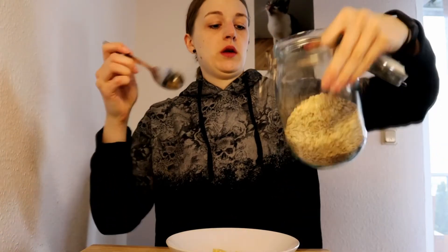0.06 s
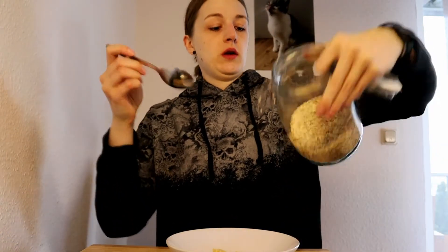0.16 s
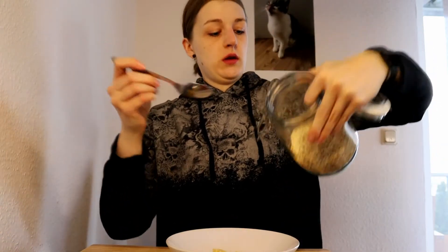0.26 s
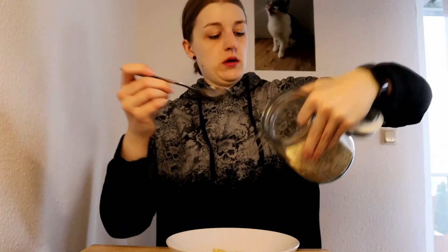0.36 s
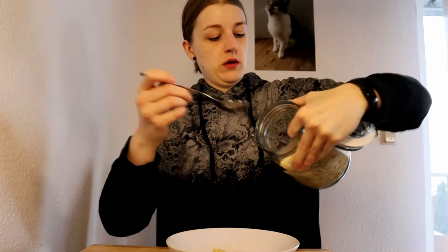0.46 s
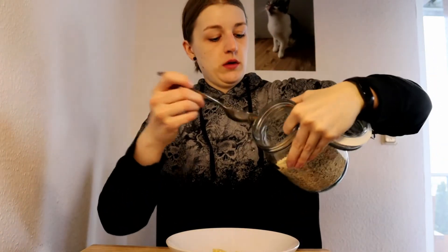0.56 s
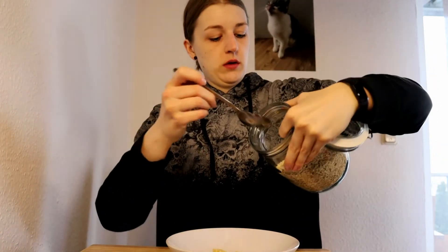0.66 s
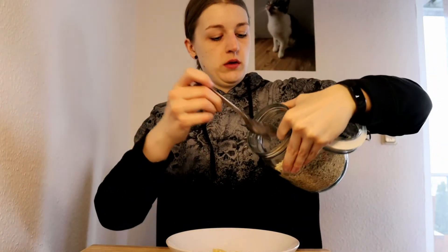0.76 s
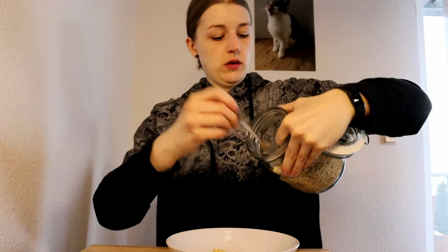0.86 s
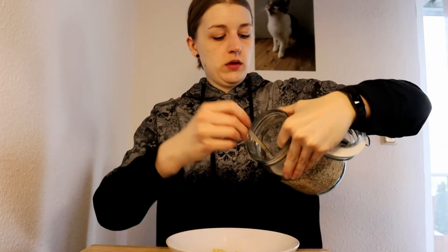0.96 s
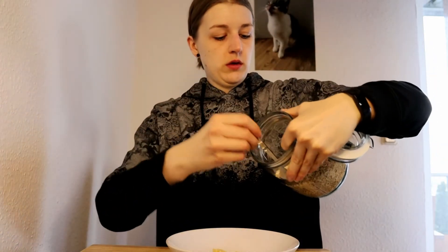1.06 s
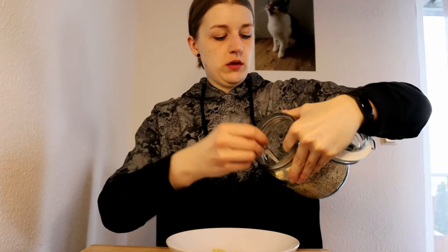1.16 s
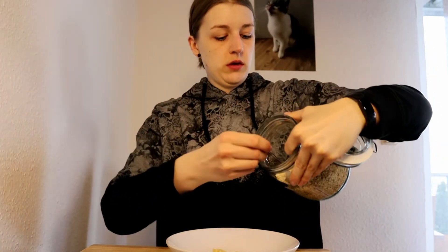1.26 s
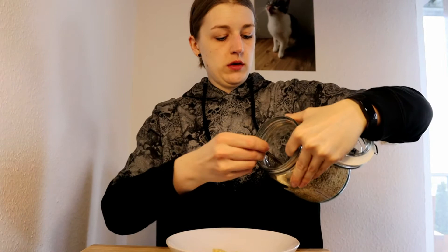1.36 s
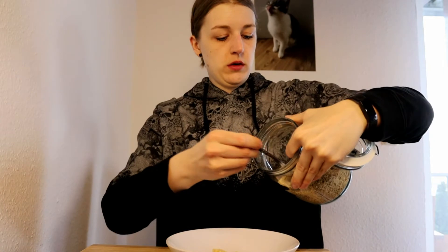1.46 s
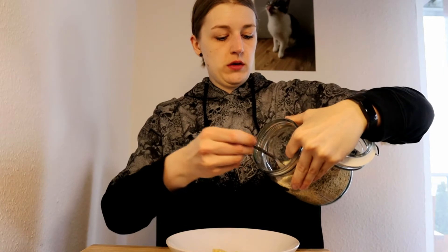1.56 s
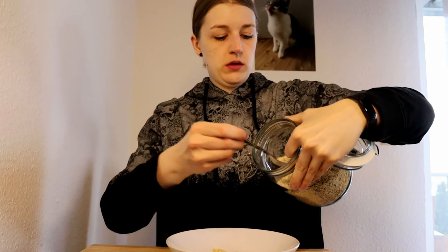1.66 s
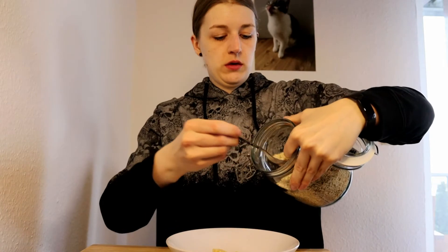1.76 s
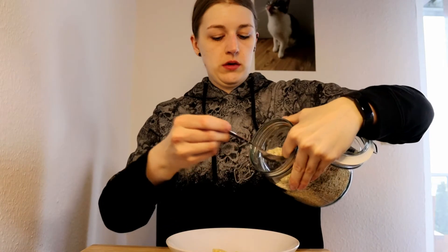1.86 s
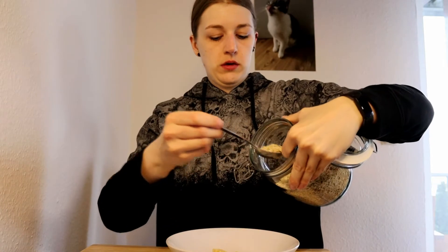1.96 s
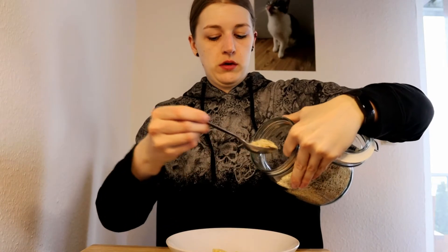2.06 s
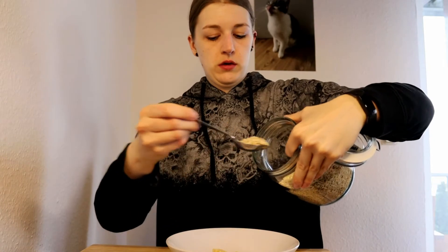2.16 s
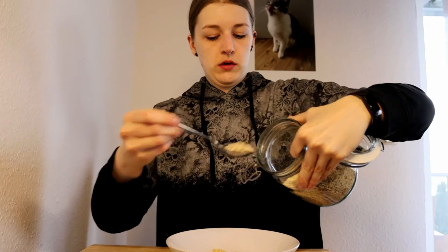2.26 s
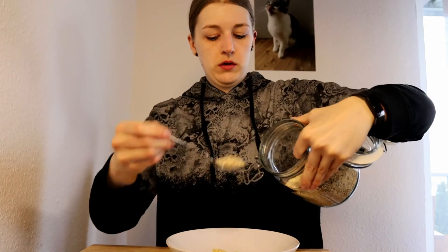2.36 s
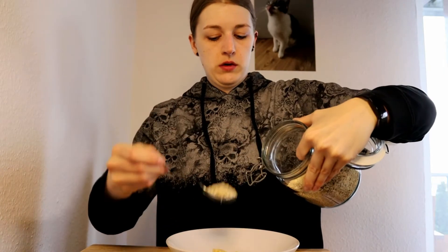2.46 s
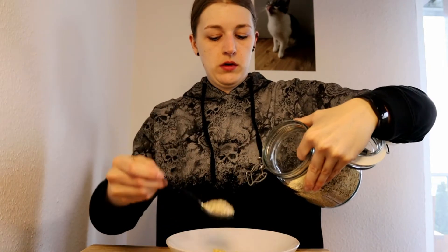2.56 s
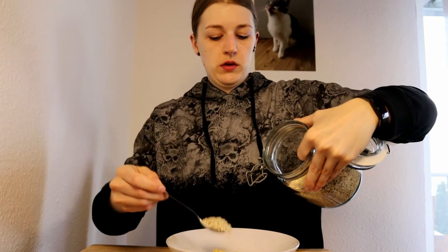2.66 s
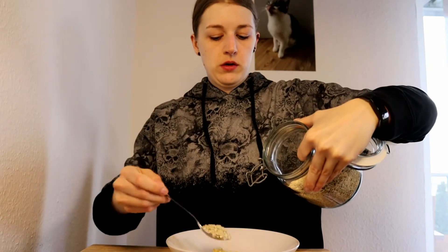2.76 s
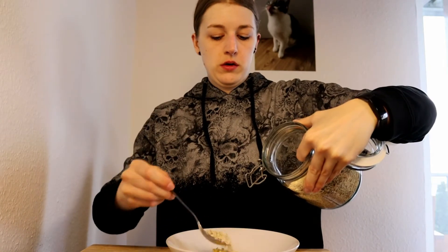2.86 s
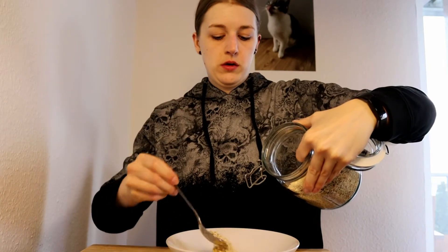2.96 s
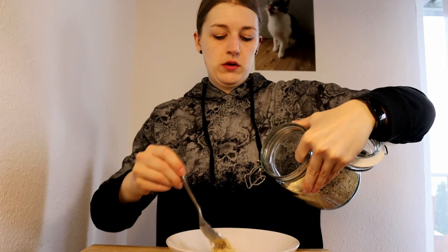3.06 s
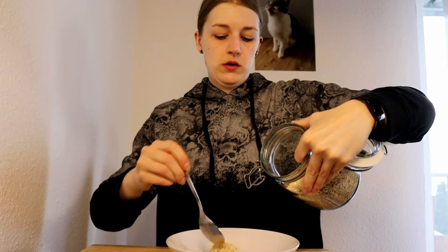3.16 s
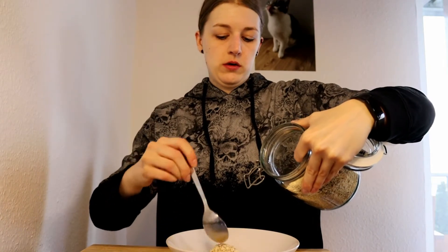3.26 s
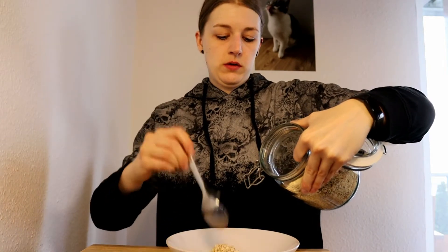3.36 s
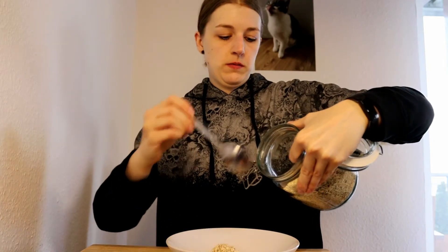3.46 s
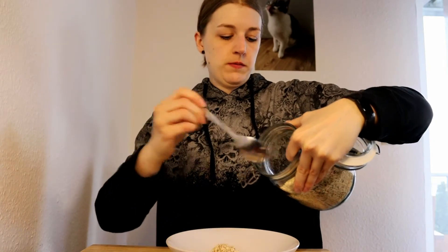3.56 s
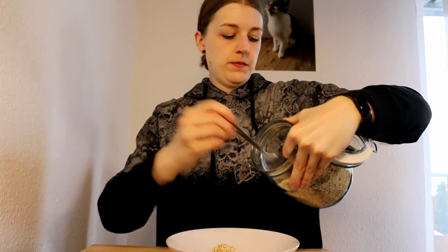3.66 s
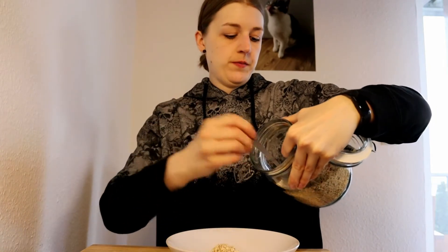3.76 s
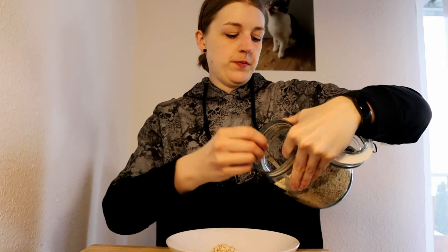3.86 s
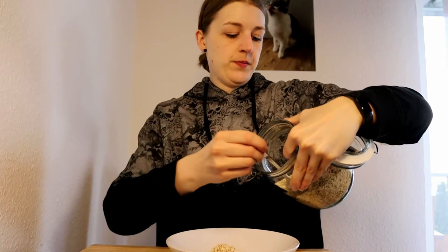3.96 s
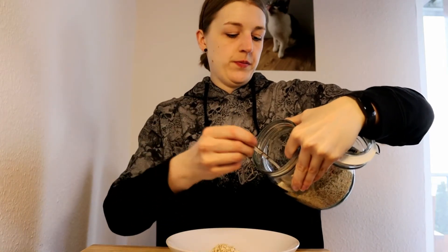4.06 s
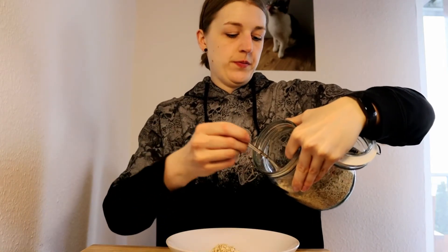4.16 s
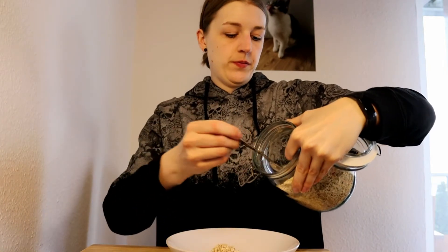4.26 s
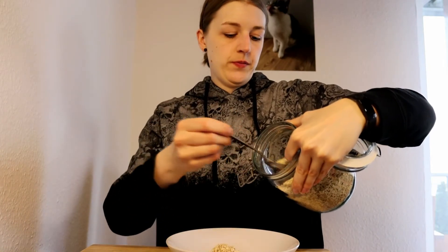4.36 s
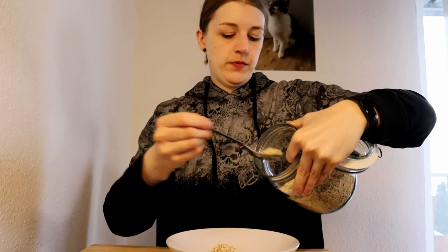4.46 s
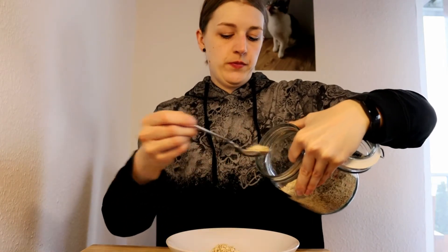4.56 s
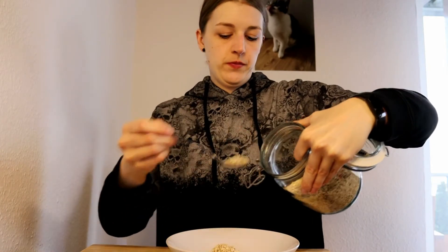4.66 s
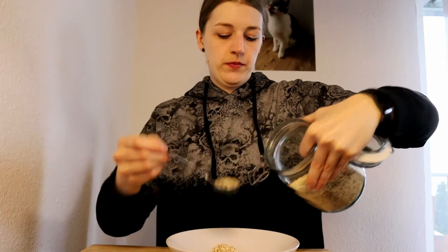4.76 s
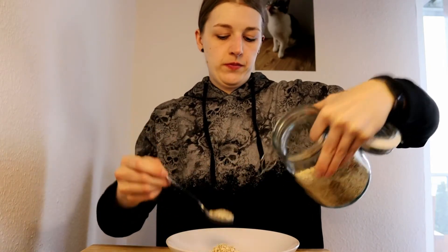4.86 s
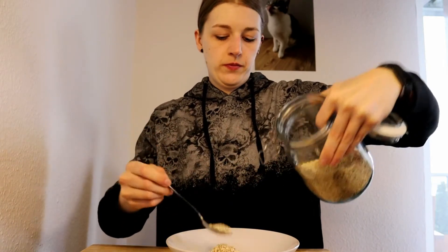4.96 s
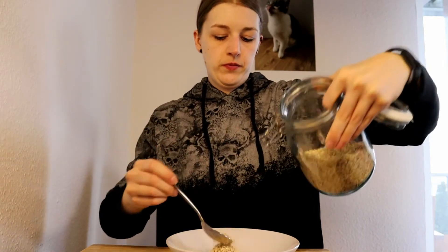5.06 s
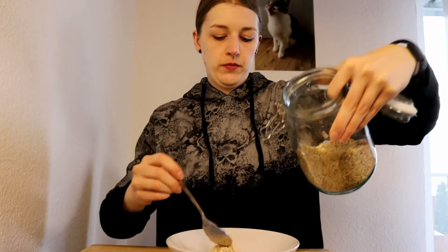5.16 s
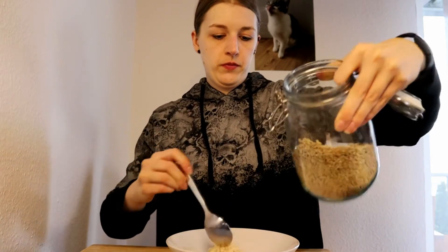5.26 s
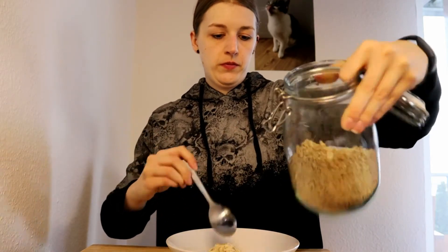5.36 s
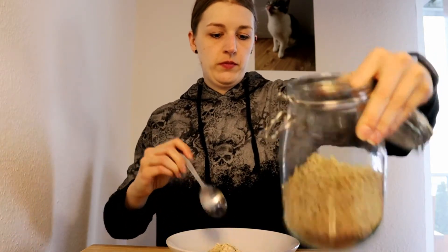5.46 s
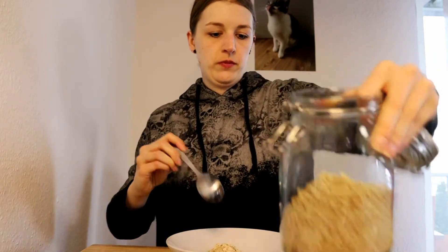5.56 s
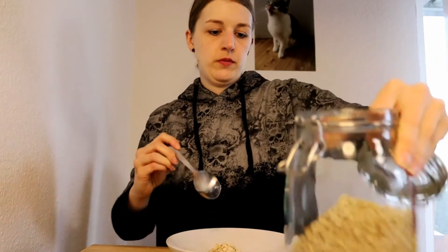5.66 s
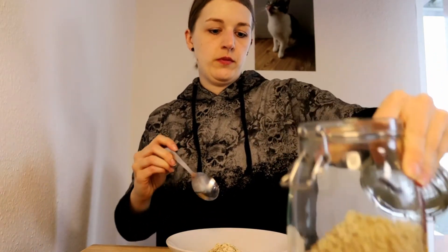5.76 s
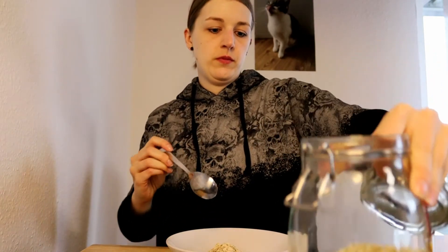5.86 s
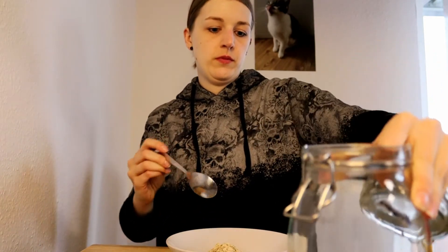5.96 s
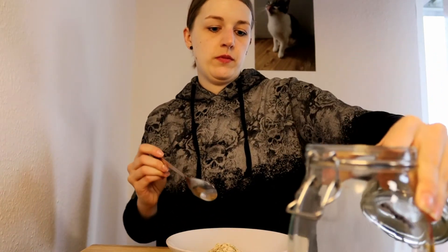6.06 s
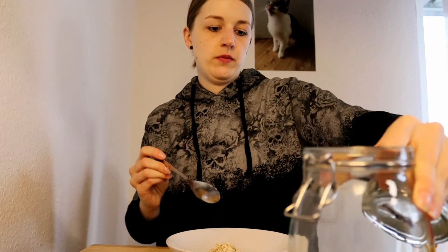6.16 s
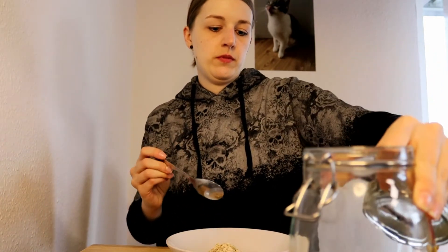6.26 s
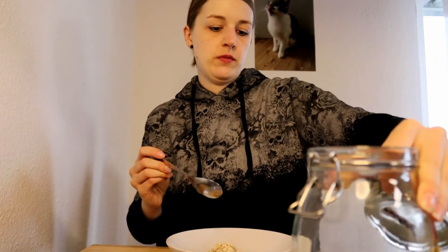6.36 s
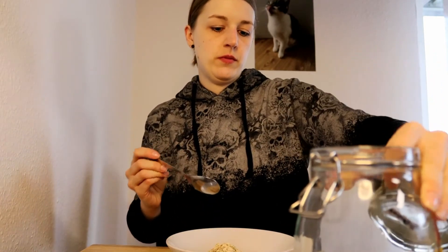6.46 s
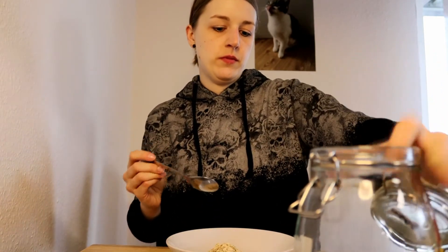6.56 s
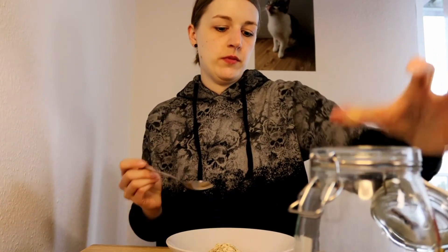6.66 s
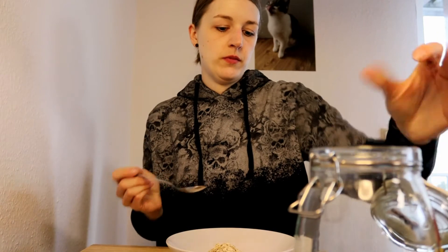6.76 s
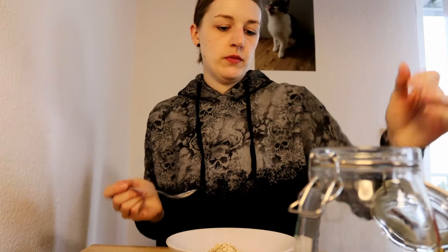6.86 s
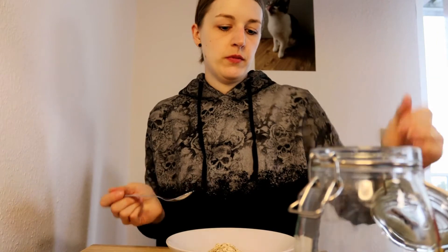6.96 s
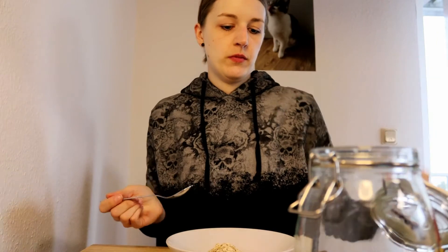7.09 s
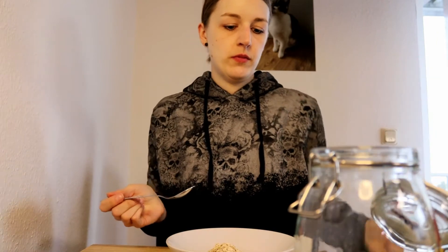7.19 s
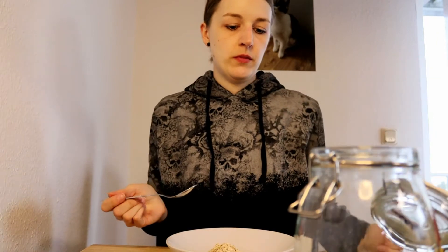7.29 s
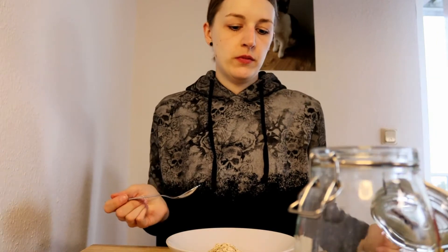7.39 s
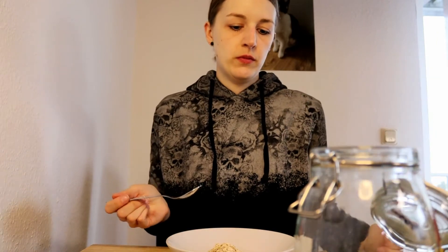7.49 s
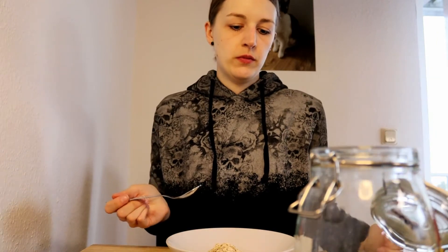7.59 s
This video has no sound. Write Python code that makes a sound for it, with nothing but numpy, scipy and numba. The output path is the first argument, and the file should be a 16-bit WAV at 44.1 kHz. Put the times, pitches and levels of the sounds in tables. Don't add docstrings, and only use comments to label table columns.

```python
import sys
import numpy as np
from scipy import signal
from scipy.fft import rfft, irfft, next_fast_len
from scipy.io import wavfile
from scipy.ndimage import uniform_filter1d
from numba import njit

SR = 44100
rng = np.random.default_rng(int(sys.argv[2]) if len(sys.argv) > 2 else 0)


def invert_db(level):
    return 10 ** (np.asarray(level, dtype=float) / 20)


def unload_wav(signal):
    wavfile.write(
        sys.argv[1],
        SR,
        np.round(np.clip(np.atleast_2d(signal).T, -1, 1) * 32767).astype(np.int16),
    )


N = 336483

GLASS_BANDS_HZ = [(550, 3000), (3000, 7000), (7000, 16500)]
LOOSE_DB, HELD_DB = 3.0, 1.5
LID_PAN_DB = -4


def set_rms(x, db):
    return x * invert_db(db) / np.sqrt(np.mean(x ** 2))


def pan(x, db):
    return x * invert_db(np.array([[db], [-db]]) / 2)


def colour(points, channels=2):
    hz, db = np.transpose(points)
    size = next_fast_len(N)
    bin_hz = np.arange(size // 2 + 1) * SR / size
    gain = invert_db(np.interp(np.log(bin_hz + 1), np.log(hz), db, -80, -80))
    return irfft(rfft(rng.standard_normal((channels, size))) * gain, size)[:, :N]


def band(x, lo_hz, hi_hz):
    edges_hz = [lo_hz, min(hi_hz, .45 * SR)]
    return signal.sosfilt(signal.butter(3, edges_hz, "band", fs=SR, output="sos"), x)


def walk(rate):
    k = int(SR / rate)
    held = np.repeat(rng.standard_normal(N // k + 1), k)
    return uniform_filter1d(uniform_filter1d(held, k), k)[:N]


@njit
def resonate(x, poles, gains):
    out = np.zeros((2, len(x)))
    for k in range(len(poles)):
        z = 0j
        for i in range(len(x)):
            z = z * poles[k] + x[i] + 1e-18
            out[0, i] += (gains[0, k] * z).imag
            out[1, i] += (gains[1, k] * z).imag
    return out


def ring(force, modes, chance, scatter_db, spread, split):
    hz, db, t60 = np.repeat(modes, 3, axis=0).T
    count = len(hz)
    hz = hz * (1 + split * chance[2, :count])
    poles = np.exp(2j * np.pi * hz / SR - np.log(1000) / (t60 * SR))
    phase = spread * chance[1, :count] * np.minimum(hz / 1200, 1)
    gains = invert_db(db + scatter_db * chance[0, :count]) * np.exp(np.outer([1j, -1j], phase))
    return resonate(force, poles, gains)


def hits(events, modes, bands_hz, cracks_db, crack_ms, tail_db, tail_ms, scatter_db, spread, split,
         pan_db, size=13000):
    out = np.zeros((2, N + size))
    ms = np.arange(size) / SR * 1000
    modes = np.array(modes)
    for s, db, second_db, third_db, chatter_ms in events:
        noise, chance = rng.standard_normal((3, size)), rng.standard_normal((3, 3, 60))
        contact = ms / chatter_ms
        force = noise[0] * contact * np.exp(-contact)
        force[8] += 3.5 / chatter_ms * np.sqrt(np.sum(force ** 2))
        fade = np.exp(-ms / (crack_ms + chatter_ms)) + invert_db(tail_db) * np.exp(-ms / tail_ms)
        crack = (.62 * noise[0] + noise[1:]) * np.minimum(contact, 1) * fade
        start = int(s * SR)
        for k, (lo_hz, hi_hz) in enumerate(bands_hz):
            inside = modes[(modes[:, 0] >= lo_hz) & (modes[:, 0] < hi_hz)]
            tone = band(ring(force, inside, chance[k], scatter_db, spread, split), lo_hz, 2 * hi_hz)
            snap = band(crack, lo_hz, hi_hz)
            part = tone / np.abs(tone).max() + invert_db(cracks_db[k]) * snap / np.abs(snap).max()
            out[:, start:start + size] += part * invert_db(db + (0, second_db, third_db)[k])
    return pan(out[:, :N], pan_db)


def slides(rows, fade_db_s):
    t, power = np.arange(N) / SR, 0
    for s, swell_s, hold_s, db in rows:
        swell_db = 30 * np.maximum(s - t, 0) / swell_s
        release_db = fade_db_s * np.maximum(t - s - hold_s, 0)
        power = power + invert_db(2 * (db - swell_db - release_db))
    return np.sqrt(power)


def grains(gain, span_s, modes, rate, scatter_db, dry_db, lo_hz, hi_hz, pan_db, split):
    start, stop = (int(s * SR) for s in span_s)
    gain = gain[start:stop]
    shape = (4, len(gain))
    strength = invert_db(scatter_db * np.minimum(rng.exponential(size=shape), 4))
    density = rate / SR * np.array([[1], [20], [20], [20]])
    ticks = (rng.random(shape) < density) * strength * rng.standard_normal(shape) * gain
    body = band(ring(ticks[0], np.array(modes), rng.standard_normal((3, 90)), 0, 0.98, split), lo_hz, 14000)
    patter = band(ticks[1] + ticks[2:], lo_hz, hi_hz)
    body, patter = (x * np.sqrt(np.mean(gain ** 2) / np.mean(x ** 2)) for x in (body, patter))
    out = np.zeros((2, N))
    out[:, start:stop] = pan(body + invert_db(dry_db) * patter, pan_db)
    return out


# t/s, level/dB
CAR_PASS = [(0, -57.5), (1.0, -53), (1.6, -51), (2.1, -46.5), (2.55, -45.5), (3.0, -48), (3.6, -49.5),
            (4.2, -50.5), (4.8, -54.5), (6.2, -54), (6.9, -58.5), (7.63, -60)]
# f/Hz, level/dB per Hz
STREET_SPECTRUM = [(15, -51.5), (25, -26.5), (43, -7), (76, -11.5), (106, -11.5), (139, -7), (311, -7.5),
                   (410, -11.5), (500, -9.5), (604, -10.5), (840, -3), (1050, -1.5), (1350, -7.5),
                   (2460, -25), (3500, -38.5), (4550, -59.5), (7700, -120)]


def car():
    t, (s, db), out = np.arange(N) / SR, np.transpose(CAR_PASS), 0
    engine_db = -64 + 5.5 * np.exp(-((t - 3.45) / 0.74) ** 2)
    body_db = -47 + 0.76 * (np.interp(t - 0.11, s, db) - db.max())
    tyre_db = np.interp(t, s, db)
    layers = [(28.85, 99, 0.19, engine_db - 4.5), (79.0, 513, 0.29, body_db), (530, 8500, 0.72, tyre_db)]
    for lo_hz, hi_hz, width, layer_db in layers:
        mid, side = colour(STREET_SPECTRUM)
        part = band(mid + width * side * np.array([[1], [-1]]), lo_hz, hi_hz)
        out = out + set_rms(part, 0) * invert_db(layer_db + 0.67 * walk(4.8))
    engine_hz = 53 * (1 + 0.01 * walk(0.66))
    drone = np.sin(2 * np.pi * np.cumsum(engine_hz) / SR)
    return out + drone * invert_db(engine_db - 2.0 + 1.2 * walk(4.9))


# full at t/s, swell/s, hold/s, rms level/dB
LEANING_ARM = [
    (0, .05, .08, -59.5),
    (7.08, .5, .3, -59.5),
]


def table_hum():
    hum_hz, half_width_hz = 126, 9
    mode = band(rng.standard_normal(N), hum_hz - half_width_hz, hum_hz + half_width_hz)
    return set_rms(mode, 0) * slides(LEANING_ARM, 164)


# f/Hz, level/dB per Hz
HISS_SPECTRUM = [(880, -27), (1500, -11.5), (1780, -3), (4550, -8.5), (4930, -8.5), (10900, -14.5),
                 (12800, -11.5), (14800, -11), (15900, -22.5), (16400, -44.5)]


def hiss():
    return set_rms(colour(HISS_SPECTRUM), -59.0)


# full at t/s, swell/s, hold/s, rms level/dB
JAR_SLIDES = [(.12, .3, .24, -62.5), (.455, .14, 0.0082, -39.5), (1.1, 0.15, 0.11, -55.5),
              (1.25, .3, .48, -60), (1.8, 0.11, .15, -67), (3.85, 0.09, 0.029, -48),
              (4.22, 0.61, 0.12, -58.5), (4.58, 0.66, 0.0085, -60), (4.963, 0.00593, 0.012, -54.5),
              (5.33, 0.33, 0.12, -50), (5.75, 0.16, .02, -57), (6.08, .03, 0.081, -54)]
# f/Hz, level/dB, t60/s
GLASS_WALL = [(3750, 4, 0.06), (4150, 2, 0.054), (4600, 0, .06), (5000, 1, 0.062), (6260, 2, 0.057),
              (8000, -0.5, .05), (8400, 1, 0.066), (9900, -8.5, 0.037), (10500, -10, .04),
              (11310, -12, 0.036), (12800, -5, .05), (13500, -4, .04), (14400, -3, .04)]


def oats_in_jar():
    gain = slides(JAR_SLIDES, 171)
    return grains(gain, (0, 6.3), GLASS_WALL, rate=700, scatter_db=2.5, dry_db=-1,
                  lo_hz=3600, hi_hz=21000, pan_db=-4.0, split=.012)


# t/s, level/dB, middle re level/dB, treble re level/dB, chatter/ms
LID_RATTLES = [(.125, -43.5, 9.5, 2, 2.8), (.184, -34, 5, 7.5, 6), (.198, -28, 0.5, 8, 5.7),
               (5.219, -53, 6.5, -12.5, 3), (5.304, -44.5, 5, 7, 4.6), (5.334, -48.5, 2, -12, 4),
               (5.399, -26, 7, 4, 2.36), (5.456, -35.5, 6.5, 9.5, 5.6), (5.543, -29, 1, 3.5, 1.1),
               (5.5495, -8, -8, -20, 2.05), (5.560, -15, -25, -20, 2), (5.596, -26, 4, 6, 5.2),
               (5.607, -11, -7, -9, 4), (5.649, -24, -7, -10, 2.5), (5.673, -22.5, 8, 12, 1.1),
               (5.700, -21, -0.5, -2, 3.8), (5.725, -27, -9, -9, 8.8), (5.765, -31.5, 1.5, 5, 8)]
# t/s, level/dB
CLASP_JINGLES = [
    (6.044, -30.5),
    (6.057, -42.5),
    (6.2, -37.5),
    (6.465, -53),
    (6.52, -61),
    (6.593, -61),
]
# middle/dB, treble/dB, chatter/ms
JINGLE_TINT = (3, 17, 3.5)
# f/Hz, level/dB, t60/s
LID_MODES = [(618, -6.5, 0.024), (1200, -2.5, 0.11), (1460, -5, 0.14), (1620, -9, 0.088), (1726, 15, 0.056),
             (1900, -1, 0.12), (1840, 8.5, 0.12), (2117, -11.5, .04), (2840, -8.5, 0.064),
             (2985, -59.5, 0.067), (3830, 7.5, 0.08), (4020, -10, 0.045), (4550, -22.5, .03),
             (4883, 13, .04), (5250, 14, .035), (5740, -26, .04), (8100, -5.5, .03), (8500, -50, 0.013),
             (9860, -0.5, 0.028), (10650, -6, 0.032), (11400, -10, 0.063), (13100, -18, 0.05),
             (13800, -2, .03), (14490, -12, .03)]


def lid_rattles():
    events = LID_RATTLES + [(*row, *JINGLE_TINT) for row in CLASP_JINGLES]
    return hits(events, LID_MODES, GLASS_BANDS_HZ, (-13, -5, -3), crack_ms=2.8, tail_db=-14, tail_ms=26,
                scatter_db=LOOSE_DB, spread=1.0, split=0.015, pan_db=LID_PAN_DB)


# t/s, level/dB, middle re level/dB, treble re level/dB, chatter/ms
LID_BUMPS = [
    (.143, -1.5, -10.5, -26, 0.6),
    (.719, -15.5, -18, -34.5, 0.41),
]
# f/Hz, level/dB, t60/s
HINGE_MODES = [(630, -40, 0.044), (1148, 0, 0.14), (1340, -10, .07), (1500, -9, .08), (1620, -1.5, 0.145),
               (1718, 3.5, 0.1), (1830, 1, 0.067), (1930, 5.5, 0.041), (2040, -5, .1), (2256, -7.5, .1),
               (2870, -14, 0.043), (3740, 8, 0.03), (4510, -11, .04), (5020, -4, .04), (5300, 0, 0.04),
               (7800, -6, 0.045), (9870, -6.5, .04), (11290, -13.5, .04)]


def lid_bumps():
    return hits(LID_BUMPS, HINGE_MODES, [(980, 3000)] + GLASS_BANDS_HZ[1:], (-13, -4, -4), crack_ms=3.4,
                tail_db=-18.0, tail_ms=30, scatter_db=HELD_DB, spread=1.0, split=0.017, pan_db=-3.5)


# t/s, level/dB, f/Hz, t60/s
FREED_MODES = [(.143, -20, 1163, .28), (.146, -20.5, 1405, 0.058), (.72, -33, 1500, .08),
               (.968, -38, 1141, .1), (5.553, -23, 3776, .06), (5.550, -27, 5350, .05),
               (5.598, -28, 5180, .07), (5.609, -25, 3700, .06), (5.650, -29.5, 3770, .06),
               (5.673, -20, 5020, .055), (5.703, -29, 5140, .05), (5.773, -30.5, 3740, 0.097),
               (6.044, -15.5, 1262, 0.31), (6.046, -16, 1058, .3), (6.203, -26, 1061, .24),
               (6.24, -24, 1085, .3), (6.199, -21, 3100, .035), (6.199, -20, 4130, .03),
               (6.199, -20, 2323, .07), (6.465, -14, 725, 0.11), (6.466, -27, 482, 0.1),
               (6.47, -23, 2620, .03), (.144, -24, 3720, .05), (5.612, -30, 1850, .6),
               (5.612, -24, 1250, .06), (5.552, -27, 2700, .025), (5.61, -26, 2800, .04),
               (6.045, -20, 410, .15), (6.2, -20, 1450, .15), (6.046, -20, 1480, .2), (6.045, -16, 780, .2),
               (.926, -21, 4980, .12), (.929, -23, 2550, .05), (1.5, -41, 1800, .3), (3.755, -30, 3780, .2),
               (.72, -31, 1180, .16), (.143, -32, 640, .03), (.72, -34, 2000, .12), (5.55, -12, 1600, .03),
               (5.22, -48, 4050, .15), (5.277, -46, 4100, .12), (5.335, -45, 4150, .12),
               (5.32, -45, 1900, .06), (5.65, -36, 600, .03), (.966, -17, 1650, .07), (6.047, -20, 930, .4),
               (6.2, -17, 735, .2)]


def pings():
    out = 0
    for s, db, hz, t60 in FREED_MODES:
        out = out + hits([(s, db, 0, 0, 1.8)], [(hz, 0, t60)], [(hz / 2, 2 * hz)], (-40,), crack_ms=1,
                         tail_db=-40, tail_ms=5, scatter_db=1.5, spread=0.9, split=.012, pan_db=LID_PAN_DB)
    return out


# t/s, level/dB, centre f/Hz, fade/ms
ROUGH_CONTACTS = [(.924, -27, 4800, 10), (3.751, -36, 5000, 14), (.43, -42, 3900, 20), (.45, -39, 4300, 25),
                  (.4, -52, 4500, 15), (5.553, -30, 2700, 12), (5.575, -36, 1250, 30),
                  (5.612, -30, 2500, 14), (5.65, -33, 2600, 8), (5.69, -36, 1200, 30),
                  (5.675, -32, 2900, 14), (5.735, -38, 1300, 30), (5.373, -48, 4100, 10),
                  (5.303, -47, 4100, 10), (6.201, -10, 1000, 6), (6.425, -38, 850, 14),
                  (6.445, -33, 1150, 12), (6.467, -20, 3000, 9), (6.468, -17, 1300, 14),
                  (6.51, -30, 1200, 18), (6.525, -36, 3000, 12), (6.06, -24, 330, 60), (6.21, -29, 340, 50),
                  (6.48, -28, 450, 40), (.143, -11, 1600, 3), (5.4, -31, 5000, 5), (6.528, -40, 4800, 10),
                  (3.751, -30, 12800, 8), (3.76, -26, 1700, 20), (6.045, -28, 8500, 10),
                  (6.045, -30, 13000, 12), (6.05, -27, 3900, 14), (6.2, -33, 11500, 8),
                  (5.77, -38, 13500, 14), (.2, -37, 5300, 10), (.965, -26, 1650, 5), (6.07, -24, 1100, 4)]


def splashes(size=9000):
    out, ms = np.zeros((2, N + size)), np.arange(size) / SR * 1000
    width, alike = 1.35, 0.7
    for s, db, hz, fade_ms in ROUGH_CONTACTS:
        noise = rng.standard_normal((3, size))
        burst = band(alike * noise[0] + noise[1:], hz / width, hz * width)
        burst = burst * (1 - np.exp(-4 * ms / fade_ms)) * np.exp(-ms / fade_ms)
        start = int(s * SR)
        out[:, start:start + size] += burst / np.abs(burst).max() * invert_db(db)
    return pan(out[:, :N], LID_PAN_DB)


# t/s, level/dB near 1.6 kHz, middle re level/dB, treble re level/dB, chatter/ms
SPOON_CLINKS = [
    (.9225, -7.5, 2.5, 9, 1.14),
    (.931, -10, -10, -20, 2.2),
    (.964, -16, -20, -20, 1.5),
    (.974, -20, -14, -20, 1.2),
    (1.002, -30, -8, -12, 2),
    (1.015, -33, -7, -9, 11.4),
    (1.244, -50, 0, -17, 3.7),
    (3.749, -11, -2.5, 3, 1),
    (3.790, -25, -13, -18, 9),
]
# t/s, level/dB
SPOON_GRAZES = [
    (1.555, -54),
    (1.66, -66),
    (1.688, -53.5),
    (1.878, -52),
    (1.91, -55),
    (4.429, -49),
]
# middle/dB, treble/dB, chatter/ms
GRAZE_TINT = (2.5, 11.3, 2.6)
# f/Hz, level/dB, t60/s
JAR_MODES = [(724, -7, 0.035), (1141, -40.5, 0.035), (1532, -7, 0.3), (1587, -2.5, .18), (1654, 1.5, 0.22),
             (1630, 3, 0.28), (1690, -1.5, .15), (1776, 0.5, 0.21), (1900, -7, 0.17), (2000, -8, .2),
             (2190, -3.5, 0.075), (2524, -3, 0.045), (3130, -12, .035), (3560, -10.5, .12), (3780, -6, 0.2),
             (3890, -5.5, .1), (4176, -11, .07), (4660, -4, 0.045), (4880, -1.5, 0.1), (5350, -5, 0.05),
             (5670, -5.5, .04), (6293, -36, .06), (6930, -36, 0.057), (7730, 3.5, 0.081), (8540, 7, 0.06),
             (8900, 0.5, 0.069), (10430, 14.5, 0.022), (10800, -10, 0.057), (11430, -59.5, .06),
             (12810, -1, 0.05), (13690, -29.5, .06), (13300, -1.5, .05), (15510, -34, 0.042)]


def spoon_on_jar():
    events = SPOON_CLINKS + [(*row, *GRAZE_TINT) for row in SPOON_GRAZES]
    return hits(events, JAR_MODES, GLASS_BANDS_HZ, (-21, 1, -3), crack_ms=1.5, tail_db=-13, tail_ms=28,
                scatter_db=HELD_DB, spread=1.3, split=0.013, pan_db=-2)


# t/s, level/dB, middle re level/dB, treble re level/dB, chatter/ms
CHINA_TICKS = [(1.498, -34, -22, -26, 4.2), (2.651, -49.5, 17, 11, 1.49), (2.748, -43.5, 16.5, 13, 1.2),
               (2.763, -33.5, -7, -6, 1.5), (4.561, -60, 6, 17, 2), (2.7, -53, 5, -13, 2),
               (2.924, -57, 12, 5, 2), (3.02, -40.5, -13, -4, 1.6), (3.094, -55.5, 17, 21, 4.3),
               (3.462, -35, -15, -22, 1.2), (3.231, -56, 23, 15, 1.5), (2.9, -58, 19, 10, 1.5),
               (2.988, -64, 16, 16, 1.5), (3.158, -59, 17, 8, 1.5), (3.219, -59, 18, 6, 1.5),
               (3.135, -61, 17, 6, 1.5), (3.343, -64, 14, 14, 1.5), (3.38, -64, 16, 14, 1.5),
               (3.255, -62, 17, 8, 1.5), (3.549, -55.5, -16, 14, 2), (4.189, -58, -16, 13, 2.8),
               (3.308, -64, 16, 8, 1.5), (3.289, -57, 20, 10, 1.6)]
# f/Hz, level/dB, t60/s
BOWL_MODES = [(1780, -13, 0.11), (1860, -18, 0.042), (3960, -6, 0.093), (4090, 5.5, 0.045),
              (6420, 6, 0.091), (6800, 4, .04), (8030, -0.5, 0.043), (9560, -1, 0.09),
              (10200, -21.5, 0.033), (10800, -10, .04), (12400, -8, .03), (13100, -2, .06),
              (13800, -1.5, .04)]


def bowl_ticks():
    return hits(CHINA_TICKS, BOWL_MODES, GLASS_BANDS_HZ, (-8, -9, -7), crack_ms=2.5, tail_db=-20, tail_ms=16,
                scatter_db=LOOSE_DB, spread=1.0, split=0.0152, pan_db=-2.5)


# full at t/s, swell/s, hold/s, rms level/dB
BOWL_SLIDES = [
    (2.7, .6, 0.15, -65),
    (2.92, 0.071, .01, -50.5),
    (3.08, 0.32, 0.099, -47.5),
    (3.23, 0.11, .12, -49),
    (3.55, 0.09, 0.008, -57.5),
    (4.965, .01, .015, -57),
    (5.23, .08, .17, -55),
]


def oats_in_bowl():
    gain = slides(BOWL_SLIDES, 260)
    return grains(gain, (2.6, 5.6), BOWL_MODES, rate=600, scatter_db=2.8, dry_db=-5,
                  lo_hz=2200, hi_hz=16650, pan_db=-2.8, split=.012)


# t/s, level/dB near 1 kHz, bass re level/dB, treble re level/dB, chatter/ms
LANDINGS = [
    [(6.043, 6, -16.5, -5.5, 1.04), (6.057, -27, -6, -11, 1.2)],
    [(6.198, 3.5, -17.5, -7, 0.87)],
    [(6.432, -32, -12, -11, 4.3), (6.458, -21, -11, -16, 3), (6.464, -5.5, -12.5, -5, 1.4),
     (6.528, -34, -1, -2.5, 7), (6.60, -42, -2, -10, 1.9)],
    [(7.345, -61.5, 20, 3, 4.4)],
]
# f/Hz, extra level/dB, ring time factor/1
LANDING_SPOTS = [
    (948, 11.5, 1.3),
    (1090, 10, 1.4),
    (1433, 22, 1.5),
    (236, 27, 0.54),
]
# f/Hz, level/dB, t60/s
TABLE_MODES = [(59.4, -16.5, .12), (130.8, -13.5, 0.63), (236, -14.5, 0.15), (329, 1, 0.08),
               (430, -19, 0.11), (552, -33, .05), (743, 0, 0.14), (931, -2.5, 0.1), (1005, 1.5, 0.12),
               (1053.7, 1.5, 0.077), (1097, -3.5, 0.13), (1251, 8.5, 0.034), (1386, -10.5, 0.074),
               (1490, -8.5, 0.1), (1640, -10, 0.15), (1890, -22, .08), (2175, -12.5, .12), (2400, -7, 0.06),
               (2634, -10, 0.046), (2840, -11, 0.06), (3150, -8.5, 0.062), (3440, -14, 0.06),
               (4100, -9, 0.045), (4260, -13.5, .06), (5120, -32.5, 0.025), (5800, -36, 0.046),
               (6600, -23, .05)]
TABLE_PAN_DB = -1.5


def freed(modes, spot_hz, extra_db, longer):
    hz, db, t60 = np.transpose(modes)
    near = np.exp(-(np.log(hz / spot_hz) / .05) ** 2)
    return np.transpose([hz, db + extra_db * near, t60 * (1 + (longer - 1) * near)])


def knocks():
    wood_bands_hz = [(670, 2000), (45, 500), (2000, 7500)]
    out = 0
    for landing, spot in zip(LANDINGS, LANDING_SPOTS):
        out = out + hits(landing, freed(TABLE_MODES, *spot), wood_bands_hz, (-12, -24, -3), crack_ms=6.2,
                         tail_db=-23, tail_ms=25, scatter_db=1.5, spread=0.93, split=0.014,
                         pan_db=TABLE_PAN_DB)
    return out


# full at t/s, swell/s, hold/s, rms level/dB
BASE_GRINDING = [
    (6.075, 0.027, 0.08, -25),
    (6.2, .05, 0.081, -36),
    (6.46, 0.028, 0.039, -32),
]


def rocking():
    gain = slides(BASE_GRINDING, 328)
    return grains(gain, (6.04, 6.9), freed(TABLE_MODES, *LANDING_SPOTS[0]), rate=2500, scatter_db=0.93,
                  dry_db=-10.0, lo_hz=680, hi_hz=3600, pan_db=-2.9, split=0.016)


@njit
def walls(x, lags, gain, damp):
    line, soft, out = np.zeros((8, 4096)), np.zeros(8), np.zeros((2, x.shape[1]))
    for i in range(x.shape[1]):
        total = 1e-18
        for k in range(8):
            soft[k] += (1 - damp) * (gain[k] * line[k, (i - lags[k]) & 4095] - soft[k])
            total += soft[k]
            out[k % 2, i] += soft[k]
        for k in range(8):
            line[k, i & 4095] = x[k % 2, i] + soft[k] - total / 4
    return out


def kitchen_echo(near):
    t60_s, damp, echo_db = 0.32, 0.36, -15
    lags = np.array([433, 587, 701, 883, 1031, 1259, 1487, 1811])
    return invert_db(echo_db) * walls(band(near, 300, 16500), lags, invert_db(-60 * lags / SR / t60_s), damp)


def scene():
    near = oats_in_jar() + lid_rattles() + lid_bumps() + pings() + splashes()
    near += spoon_on_jar() + bowl_ticks() + oats_in_bowl()
    near += knocks() + rocking()
    return near + kitchen_echo(near) + car() + table_hum()


def low_pass(x):
    return signal.sosfilt(signal.butter(12, 16530, fs=SR, output="sos"), x)


def record(dry):
    dip_hz, dip_width_hz, dip_depth = 6870, 2400, 0.66
    shaded = signal.lfilter(*signal.iirpeak(dip_hz, dip_hz / dip_width_hz, fs=SR), dry)
    wet = dry - dip_depth * shaded
    wet = np.tanh(0.73 * (wet + hiss())) / 1.139
    wet = signal.sosfilt(signal.ellip(6, .2, 28, 15520, fs=SR, output="sos"), wet)
    return low_pass(wet)


dry = scene()
out = record(dry)
unload_wav(out)
```